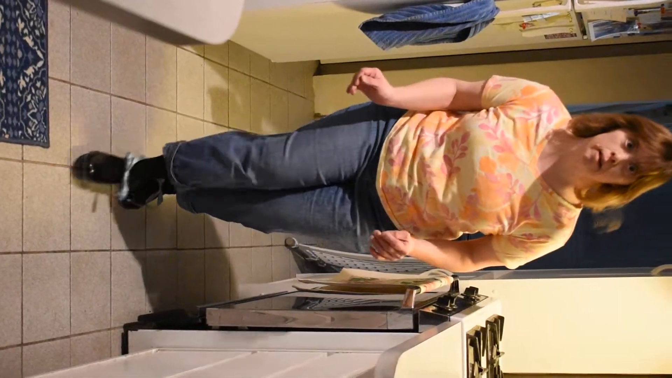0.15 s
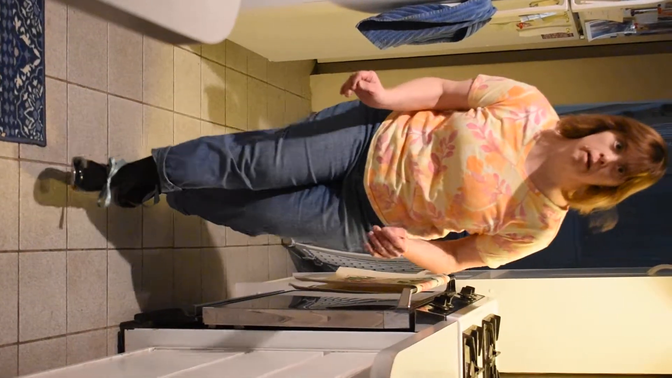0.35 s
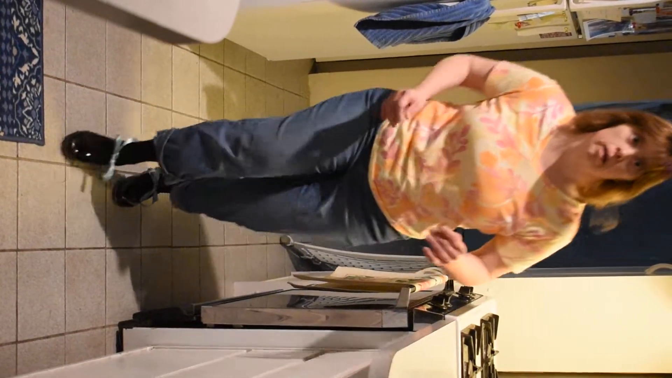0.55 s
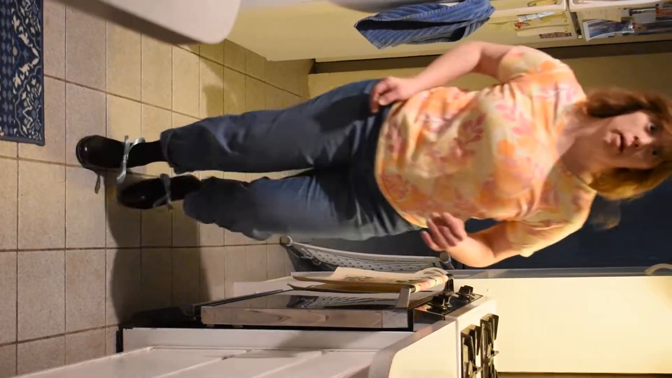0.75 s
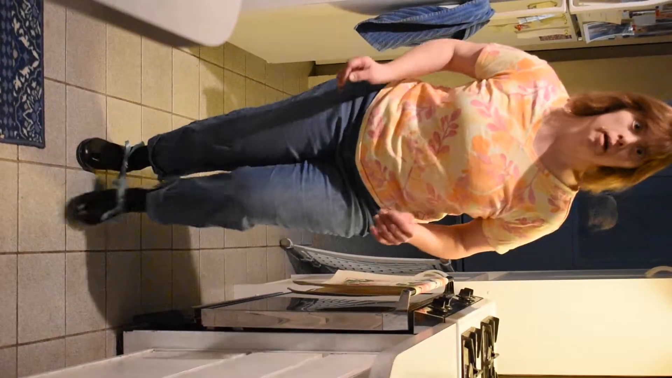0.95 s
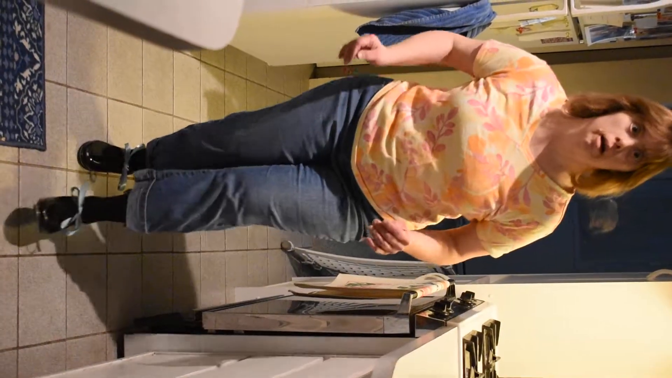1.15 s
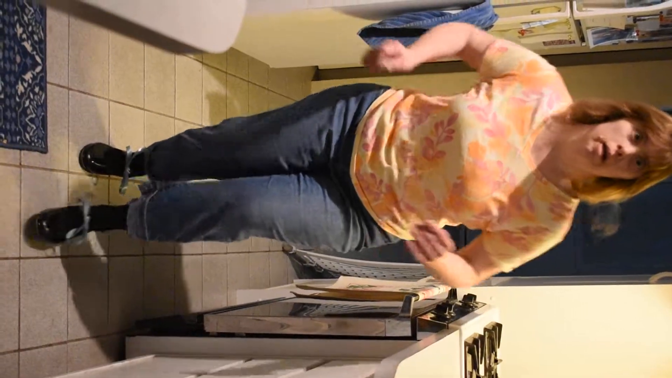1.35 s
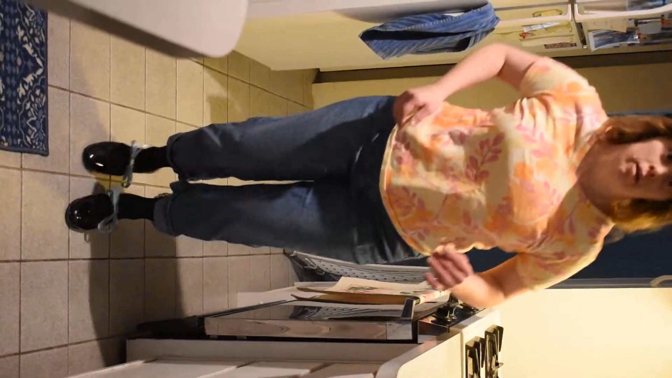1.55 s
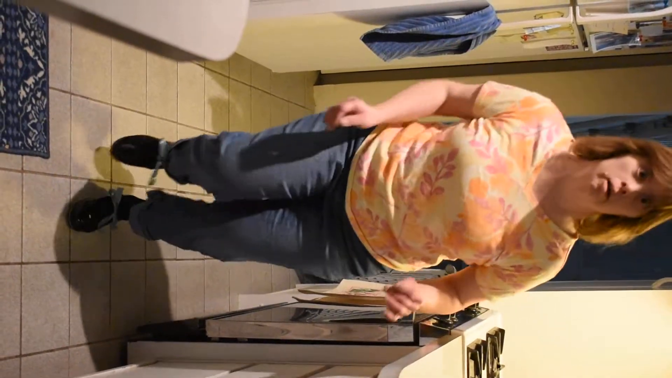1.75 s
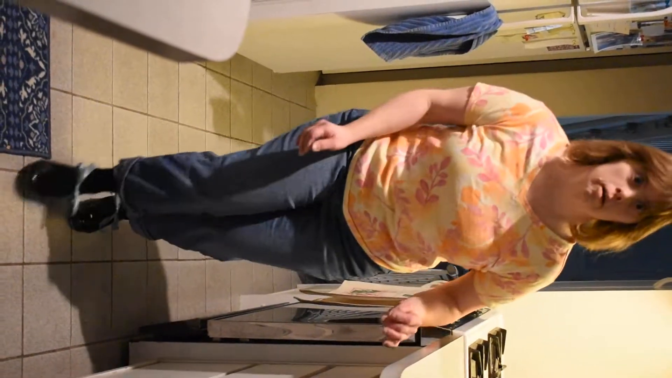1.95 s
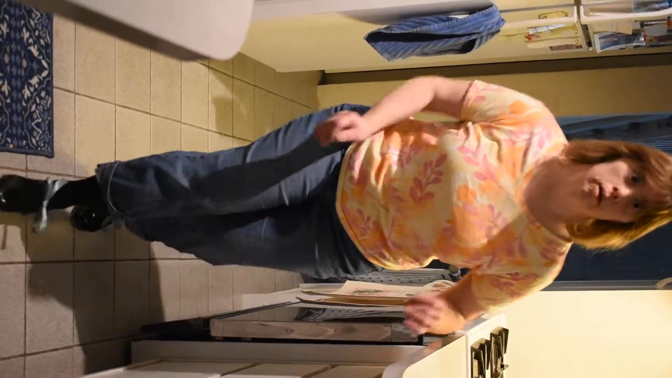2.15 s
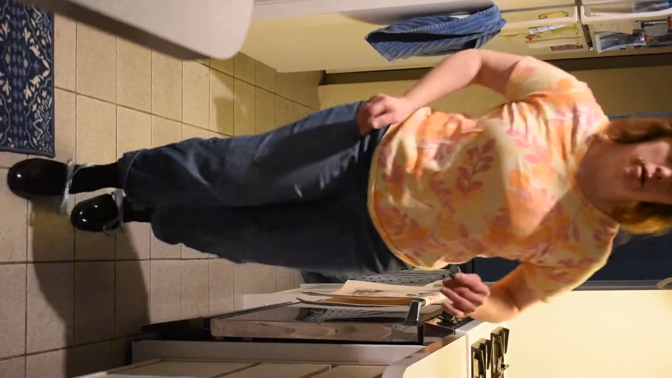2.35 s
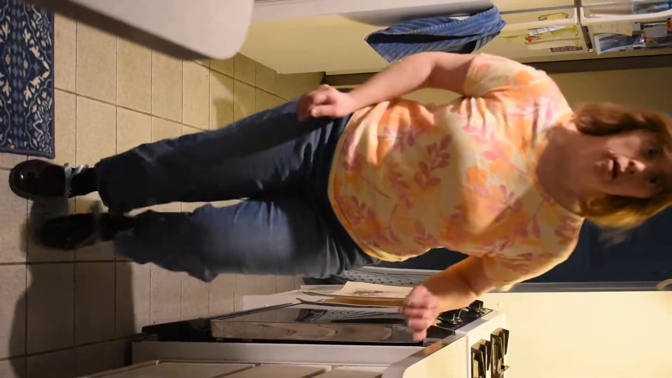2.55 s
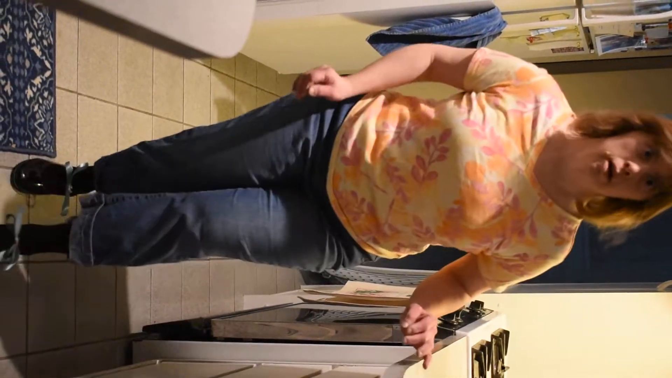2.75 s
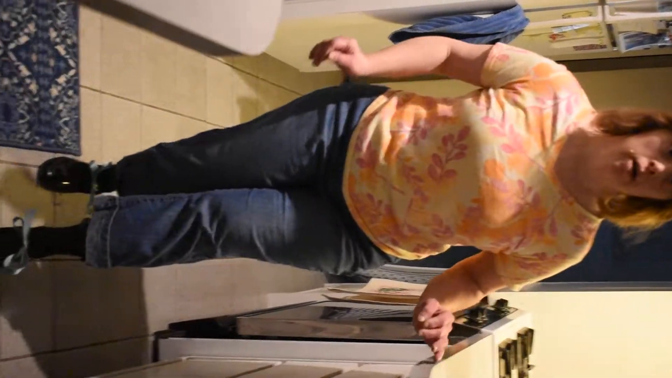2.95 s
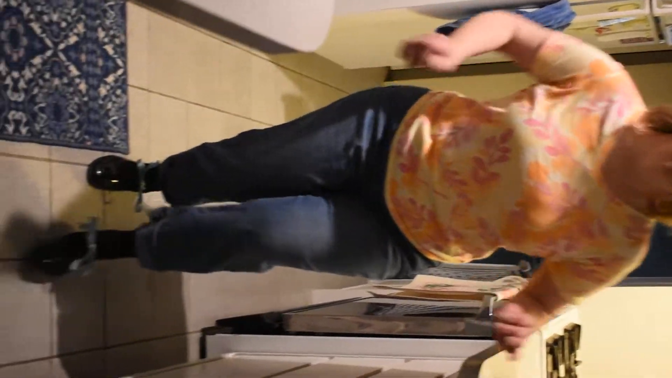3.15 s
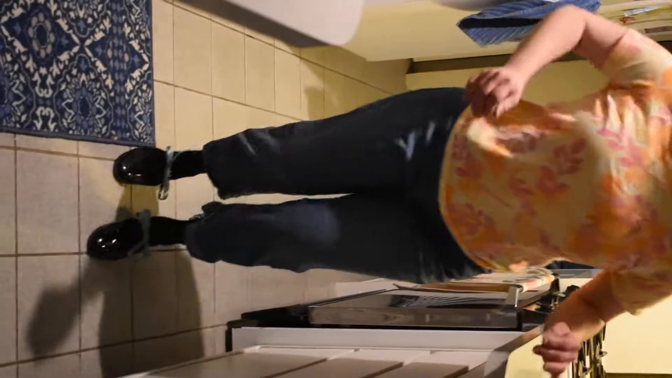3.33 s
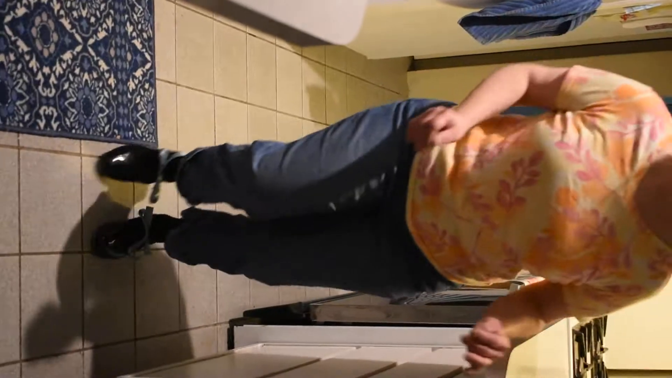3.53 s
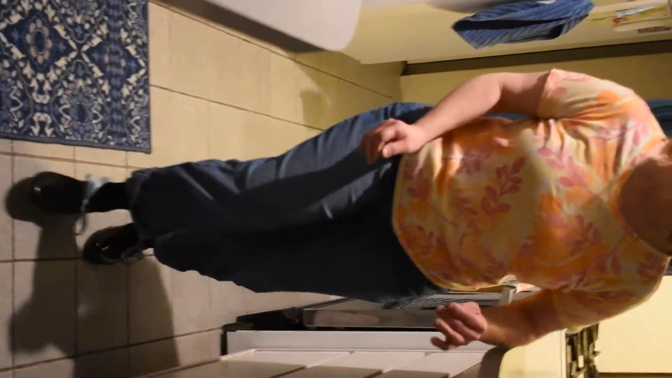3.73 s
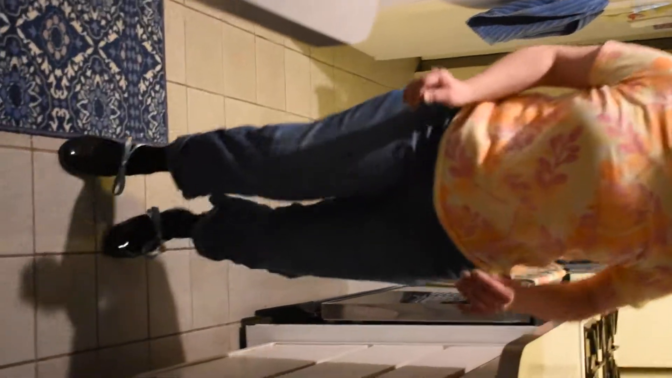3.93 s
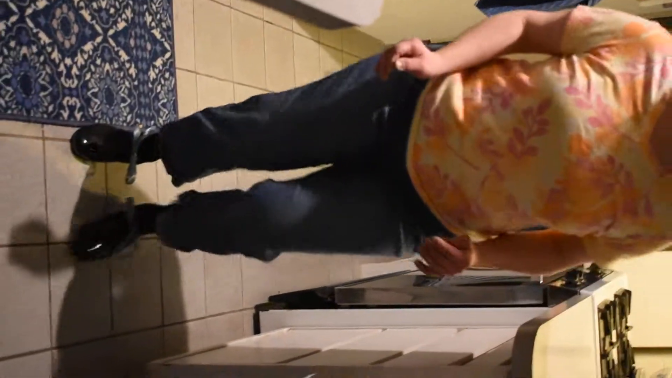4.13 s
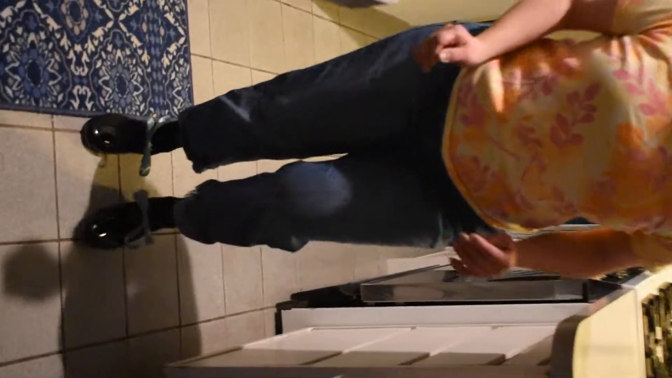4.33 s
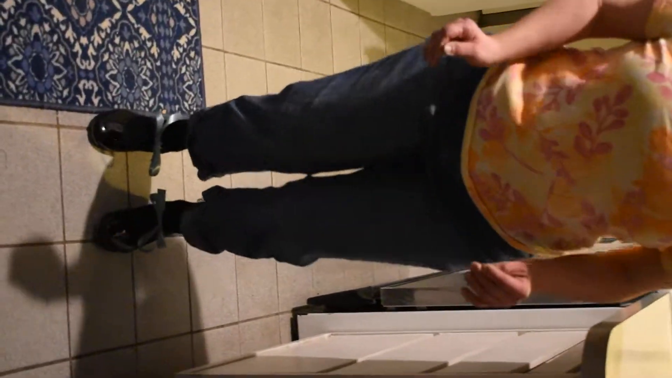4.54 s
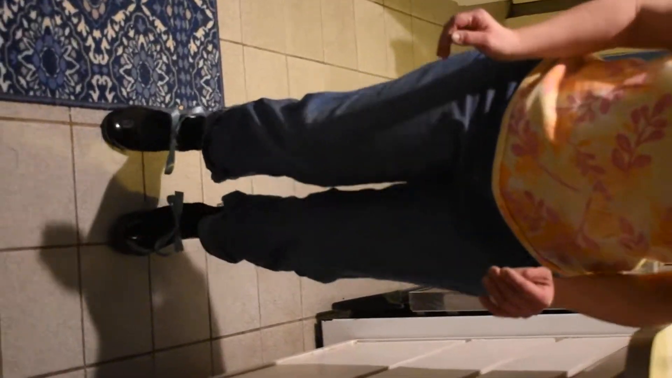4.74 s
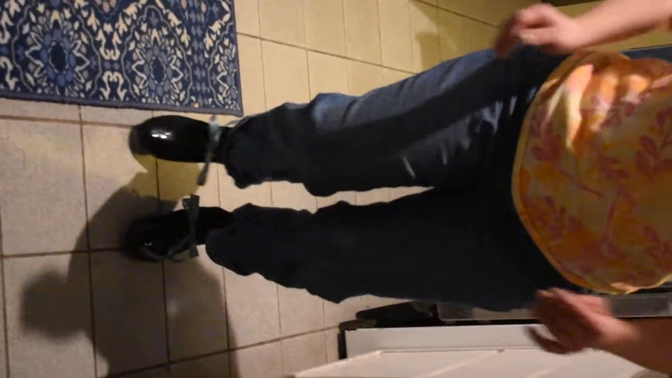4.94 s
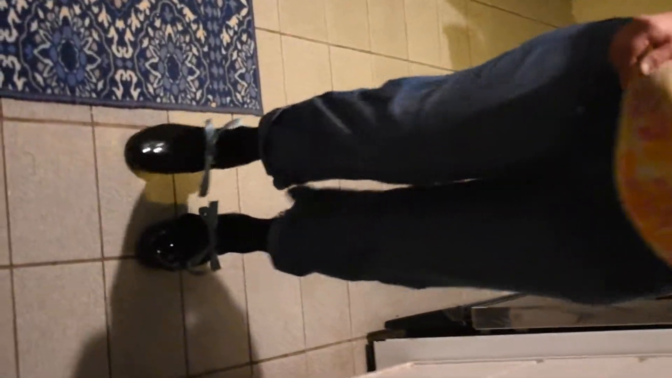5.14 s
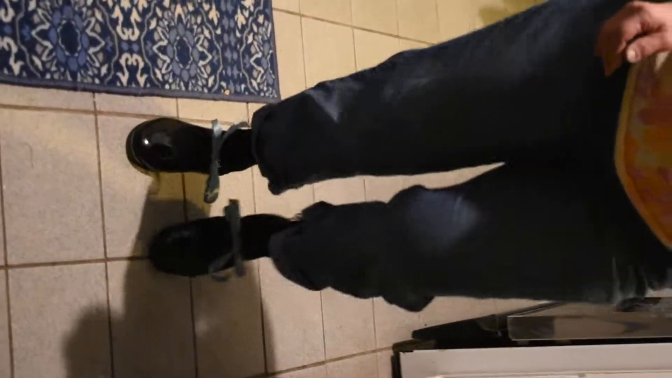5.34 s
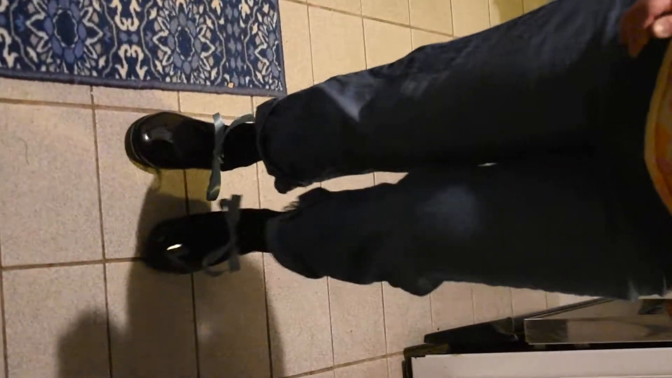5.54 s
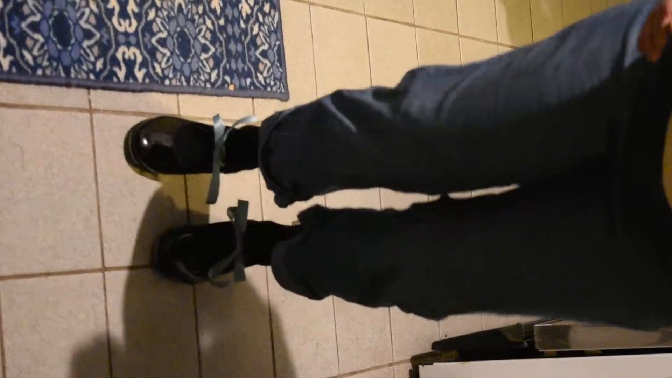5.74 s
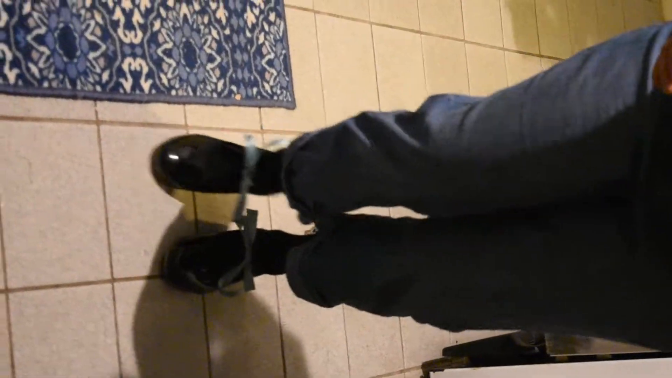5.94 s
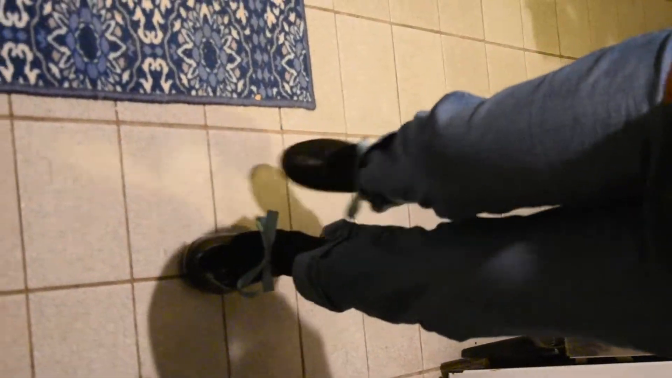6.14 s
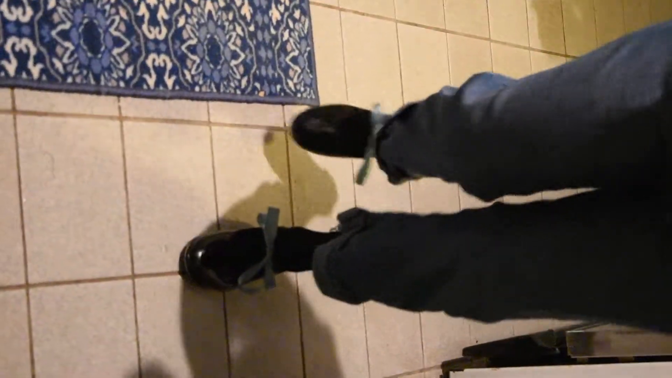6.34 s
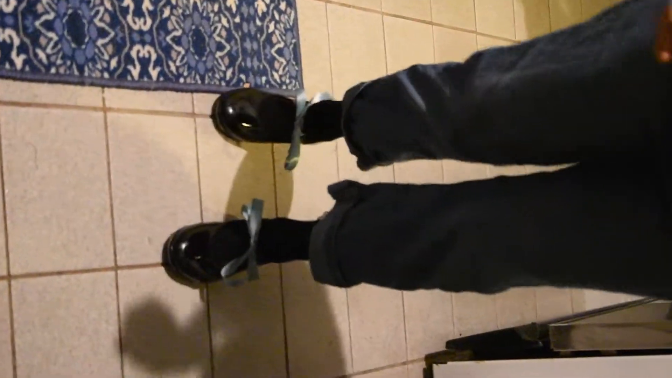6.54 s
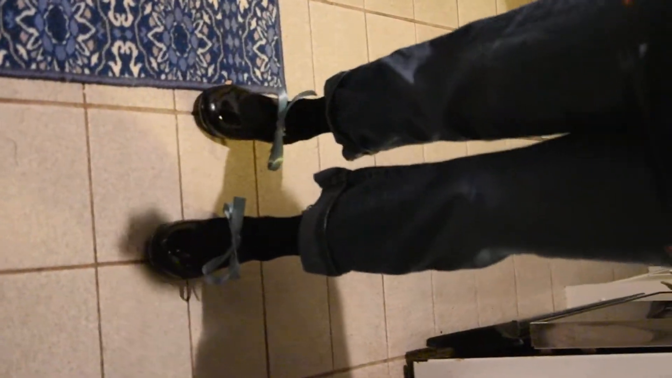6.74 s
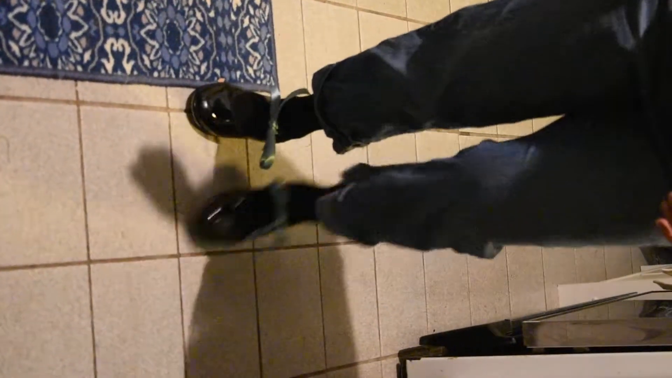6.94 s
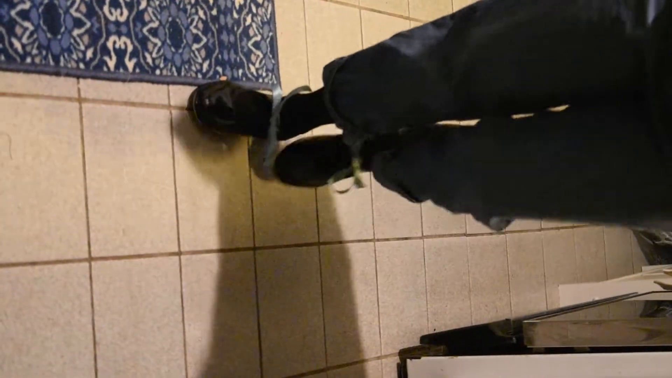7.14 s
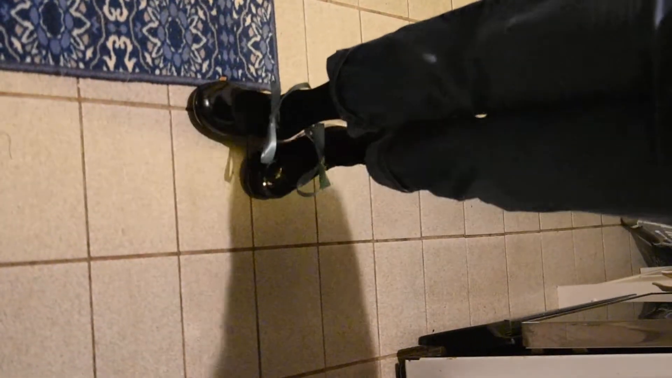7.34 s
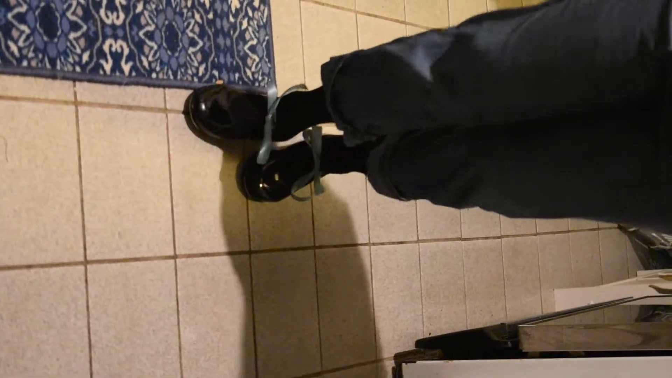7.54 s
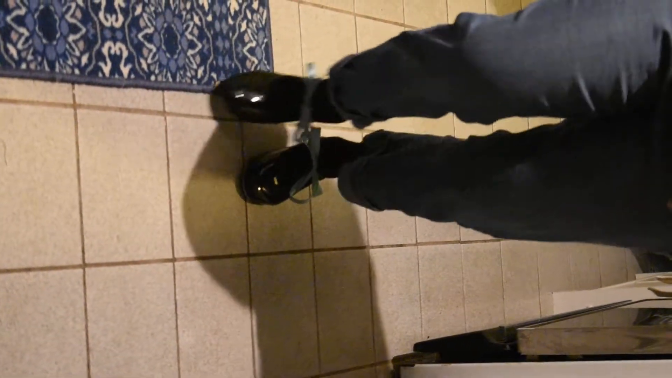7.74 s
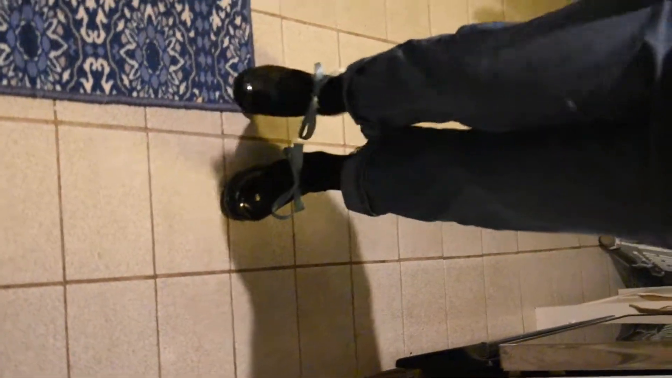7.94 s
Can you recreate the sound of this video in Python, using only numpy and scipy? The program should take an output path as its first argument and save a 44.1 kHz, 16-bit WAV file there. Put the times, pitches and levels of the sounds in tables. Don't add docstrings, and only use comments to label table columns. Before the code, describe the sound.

In a small, hard-walled kitchen, someone practises tap steps in metal-plated shoes. Sharp knocks with a loose metallic clap alternate with hollow slaps that skim across the tile, never in a steady beat. It starts strong, bunches up midway, then dwindles to isolated stamps and faint brushes. A steady soft appliance hum lies under everything, and the hand-held microphone, a few metres off, adds slight grip rumble and small plastic ticks late on.

```python
import sys
import numpy as np
from scipy import signal
from scipy.fft import rfft, irfft
from scipy.io import wavfile
from scipy.ndimage import uniform_filter1d

SR = 44100
rng = np.random.default_rng(int(sys.argv[2]) if len(sys.argv) > 2 else 0)


def to_wav(s):
    ch = np.atleast_2d(s).T
    pcm = np.round(np.clip(ch, -1, 1) * 32767)
    wavfile.write(sys.argv[1], SR, pcm.astype(np.int16))


def nominal_scale(level):
    x = np.asarray(level, float) / 20
    return 10 ** x


N = 356328

# pitch_hz, density_db (per Hz)
HUM_SPECTRUM = [(41, -46), (70, -20), (190, -6), (233, 3), (293, -3.5), (360, 0), (494, -5.5), (711, -8),
                (892, -5.5), (977, -9), (1230, -6.5), (5500, -23), (6750, -28.5), (16000, -45)]
# pitch_hz, side_to_mid_db
HUM_SPREAD = [(60, 4), (180, -16), (550, -9), (1650, -8.5), (4970, -3.5), (15000, 0.5)]
# pitch_hz, width_hz, level_db
COMPRESSOR_DRONE = [(47, 21, -71), (122.3, 21, -58.5)]
# centre_s, level_db
GRIP_SHIFTS = [
    (.56, -58),
    (1.74, -61),
    (2.45, -58),
    (2.57, -44),
    (2.9, -52),
    (3.58, -69),
    (3.8, -65),
    (5.35, -58),
    (8.01, -57),
]
# pitch_hz, width_hz, level_db
SLAB_MODES = [(193, 84, 1.5), (346, 126, 6), (500, 1330, -0.5)]
# pitch_hz, width_hz, level_db
PLATE_FACE_MODES = [(2200, 2560, 12.5), (3200, 3060, -12.5), (4300, 970, 0), (5007, 1200, -4)]
# pitch_hz, width_hz, level_db
PLATE_EDGE_MODES = [(5830, 4100, 15), (8000, 530, -8), (10700, 3800, -0.5), (12800, 4700, -2)]
# start_s, length_s, first_pressure_db, last_pressure_db, plate_ring_db
SCUFFS = [
    (0.049, 0.082, -28, -18.5, 8),
    (0.684, 0.096, -40, -36.5, 3.5),
    (1.54, 0.087, -31, -28.5, 5.5),
    (3.716, 0.2, -50.5, -60, 4.5),
    (4.66, 0.043, -50, -51, 5.5),
    (4.105, 0.11, -20.5, -25, 3.5),
    (3.486, .04, -40, -37.5, -20),
    (5.21, 0.13, -35, -45, -0.5),
    (5.359, 0.098, -31, -30.5, 6),
    (7.881, 0.16, -68, -46.5, 3.5),
]
# start_s, length_s, first_pressure_db, last_pressure_db, plate_ring_db
SKIMS = [
    (0.138, 0.061, -10, -16.5, -10),
    (.46, 0.046, -16, -30, -0.5),
    (1.032, 0.11, 0.5, -35.5, -12.5),
    (1.98, 0.12, -13.5, -12.5, -9.5),
    (2.075, 0.074, -10, -22.5, -7),
    (3.09, 0.063, -7.5, -38, -40),
    (4.054, .05, -29.5, -15, -3.5),
    (4.194, 0.049, -23, -26.5, -7),
    (3.481, 0.046, -40.5, -36, 4),
]
# contact_s, blow_db, hollow_hz, plate_ring_db, plate_edge_db
STAMPS = [(0.648, -21, 1690, 1, -16), (1.692, -25, 900, 1, -17.5), (2.373, -18, 810, 1, -9.5),
          (2.531, -21, 1000, 3.5, -20), (3.925, -22, 845, -3, -11.5), (4.101, -17, 1010, -1.5, -14),
          (4.409, -14, 910, -4, -11.5), (4.53, -35.5, 850, -6, -33.5), (5.174, -27, 935, 2.5, -2.5),
          (5.204, -30.5, 1500, -1, -4.5), (5.352, -28, 1740, 7.5, -40), (5.576, -20.5, 940, -5.5, -12.5),
          (5.668, -31.5, 1440, -3.5, -34), (6.458, -19.5, 1020, 0, -16.5), (6.686, -34, 1580, -3.5, -48),
          (7.223, -21.5, 1450, -3, -11), (7.232, -31.5, 1080, 2, -20), (7.589, -42.5, 1450, -7, -24)]
# contact_s, blow_db, hollow_hz, plate_ring_db, plate_edge_db
TAPS = [
    (0.059, -16, 1600, 0.5, -10),
    (0.846, -25, 1820, -2, -36),
    (1.308, -26.5, 974, -33.5, -23.5),
    (1.53, -17, 940, -5, -12.5),
    (3.086, -15.5, 920, -50, -25),
    (3.321, -13.5, 1180, -9, -23),
    (3.497, -30, 1820, -13, -47),
    (7.648, -38.5, 1750, -4, -18),
    (7.673, -31, 1740, -8, -23.5),
]
# contact_s, blow_db, hollow_hz, plate_ring_db, plate_edge_db
SLAPS = [
    (0.455, -9.5, 930, -26, -56),
    (0.483, -6.5, 980, -40, -49),
    (1.0235, -7, 890, -3.5, -16),
    (1.088, -19.5, 920, -49, -10),
    (1.974, -14, 920, -2, -13),
    (3.586, -38.5, 810, -24, -37),
    (4.199, -16.5, 1520, -5.5, -47),
]
# contact_s, level_db, pitch_hz, width_hz
PLATE_CHIMES = [(.062, -25.5, 5270, 1510), (.456, -36, 4300, 600), (.456, -20.5, 2200, 1220),
                (.484, -30.5, 4300, 500), (.649, -35, 6760, 2030), (.848, -42.5, 3700, 1200),
                (.848, -62, 7000, 900), (1.025, -26.5, 4440, 2500), (1.532, -49, 5800, 2000),
                (1.693, -28, 2140, 900), (2.534, -22.5, 2200, 900), (2.534, -28.5, 4050, 900),
                (3.322, -39.5, 6900, 1500), (3.322, -30, 2280, 1200), (3.5, -71, 8350, 1300),
                (3.926, -27.5, 2280, 1210), (5.177, -31, 3200, 900), (5.178, -52, 9550, 3000),
                (5.204, -43.5, 9350, 3000), (5.577, -34.5, 6500, 2470), (1.532, -45, 11200, 2500),
                (5.669, -40, 2430, 1000), (6.459, -35, 5040, 900), (6.458, -39.5, 7670, 1200),
                (6.689, -63, 3360, 1800), (7.225, -43.5, 5430, 800), (4.41, -30, 8100, 2500),
                (5.354, -40, 3400, 2200), (6.459, -48, 12500, 4000), (2.534, -44.5, 6850, 1500)]
# start_s, length_s, level_db, pitch_hz, width_hz
BRUSHES = [(1.304, 0.021, -45.5, 6800, 2700), (1.465, 0.013, -39, 3800, 1700),
           (2.215, .03, -43.5, 4370, 4200), (2.361, .012, -22.5, 3640, 6000),
           (3.043, 0.021, -52, 3200, 4200), (5.878, 0.022, -54, 4000, 4000), (5.88, 0.065, -42, 1670, 900),
           (5.965, 0.049, -67, 9300, 2500), (6.696, 0.054, -53, 2780, 2300),
           (6.837, 0.061, -46.5, 4400, 1300), (6.843, 0.052, -53, 7840, 1500), (7, 0.03, -70, 2000, 1500),
           (7.415, 0.021, -56, 5000, 6000), (7.549, 0.035, -60, 5800, 3000)]
# start_s, length_s, level_db, pitch_hz, width_hz
SINGS = [(0.074, 0.088, -18, 4800, 2160), (0.454, 0.061, -27, 3704, 1019), (1.024, 0.078, -15.5, 930, 400),
         (1.982, 0.18, -37.5, 7230, 1400), (1.988, 0.086, -25, 5000, 972), (2.0, .16, -17.5, 865, 270),
         (2.046, 0.053, -23, 2200, 520), (3.088, 0.066, -17, 980, 417), (3.089, 0.056, -38, 7300, 3500),
         (5.4, 0.04, -25, 5600, 2000), (5.367, 0.074, -24, 1450, 370.4), (1.57, 0.083, -39.5, 7300, 3500),
         (1.978, 0.11, -57, 11000, 1800), (3.09, 0.069, -19, 480, 350), (1.026, 0.059, -34, 350, 180),
         (3.485, 0.016, -50, 8100, 1400)]
# pitch_hz, level_db
DIRECT_PATH = [(300, -16.5), (1000, -8.5), (3000, -12.5), (5000, -8), (7800, -4), (10500, -9), (14000, -12)]
# delay_s, level_db
WALL_ECHOES = [(.0045, -17), (.0072, -5.5), (0.015, -49), (0.0203, -5)]
# pitch_hz, t60_s
KITCHEN_DECAY = [(120, 0.28), (320, 0.32), (900, 0.27), (2200, 0.27), (5800, 0.24), (13000, 0.17)]
# pitch_hz, side_to_mid_db
REVERB_SPREAD = [(60, -21.5), (150, -88), (380, -25.5), (950, -26), (2380, -15.5), (5980, -10.5),
                 (15000, 0)]
# start_s, level_db, pitch_hz, t60_s
HOUSING_TICKS = [(5.932, -16, 292, 0.017), (5.931, -19, 1070, 0.0051), (5.932, -23, 2200, 0.012),
                 (5.942, -35.5, 3520, .015), (6.109, -8.5, 265, 0.016), (6.11, -11, 1220, 0.0026),
                 (6.223, -41, 9500, .002), (6.257, -34, 7500, .002), (6.258, -47, 11500, .002),
                 (6.267, -34, 7490, .002), (6.268, -45, 11500, .002), (6.274, -41, 9000, .002),
                 (6.294, -42, 7000, 0.0068), (6.335, -66, 9000, .004), (6.665, -36.5, 1720, 0.11),
                 (6.665, -22, 405, 0.015), (7.952, -29.5, 187, 0.056)]

HUM_DB = -48.5
GRIP_DB, TREMOR_DB, SHIFT_S = -69.5, 4, .06
STAMP_THUD_DB, TAP_THUD_DB, SLAP_THUD_DB = 2.5, -6, -19
SCUFF_THUD_DB, SCUFF_HOLLOW_HZ, SCUFF_EDGE_DB = 1.5, 1220, -10
SKIM_THUD_DB, SKIM_HOLLOW_HZ, SKIM_EDGE_DB = -24.5, 950, -27.5
LEAD_S = .003
SLAB_HZ = 99


def evened(x):
    return x / np.sqrt(np.mean(x ** 2) + 1e-20)


def read(points, hz):
    f, value = np.transpose(points)
    return np.interp(np.log(hz + 1), np.log(f + 1), value)


def add(mix, s, sound):
    part = mix[round(s * SR):][:len(sound)]
    part += sound[:len(part)]


def resonate(x, hz, width):
    turn = np.exp(2j * np.pi * np.cumsum(hz * np.ones(len(x))) / SR)
    r = np.exp(-np.pi * width / SR)
    smooth = signal.lfilter([(1 - r) ** 2], [1, -2 * r, r * r], x / turn)
    return 2 * (turn * smooth).real


def humps(hz, modes):
    power = sum(nominal_scale(db) ** 2 / (1 + (1.495 * (hz - f) / w) ** 2) ** 3 for f, w, db in modes)
    return power / power.mean(axis=0)


def causal(gain):
    log_gain = np.log(np.r_[gain, gain[-2:0:-1]] + 1e-5)
    return np.fft.ifft(np.exp(np.conj(signal.hilbert(log_gain)))).real[:len(gain)]


def hum():
    frames, hz = N // 512 + 5, np.fft.rfftfreq(2048, 1 / SR)
    a, b, c, d, patches = rng.standard_normal((frames, len(hz), 5)).T
    patches = uniform_filter1d(patches, size=25, axis=0)
    patches = evened(uniform_filter1d(patches, size=10, axis=1))
    spread = nominal_scale(read(HUM_SPREAD, hz))[:, None]
    z = np.array([a + 1j * b, (c + 1j * d) * spread])
    z *= nominal_scale(read(HUM_SPECTRUM, hz)[:, None] + 1.3 * patches)
    air = signal.istft(z, nperseg=2048, noverlap=1536)[1][:, :N]
    return nominal_scale(HUM_DB) * air / np.std(air[0])


def drone():
    return sum(nominal_scale(db) * evened(resonate(rng.standard_normal(N), hz, w)) for hz, w, db in COMPRESSOR_DRONE)


def grip():
    hand = evened(resonate(rng.standard_normal(N), 37, 45))
    tremor = evened(resonate(rng.standard_normal(N), 3.5, 9.8))
    t = np.arange(N) / SR
    level = nominal_scale(GRIP_DB + TREMOR_DB * tremor)
    for s, db in GRIP_SHIFTS:
        level += nominal_scale(db) * np.exp(-((t - s) / SHIFT_S) ** 2)
    return hand * level


def shoe(hz, thud_db, hollow_hz, ring_db, edge_db, hollow_width):
    hollow = humps(hz, [(hollow_hz, hollow_width, 0), (1250, 1300, -7)])
    slab = nominal_scale(2 * thud_db) * humps(hz, SLAB_MODES)
    faces = nominal_scale(2 * ring_db) * humps(hz, PLATE_FACE_MODES)
    dull_db = 0.22 * np.minimum(edge_db + 18, 0) * np.log2(np.maximum(hz / 7500, 1))
    edges = nominal_scale(2 * (edge_db + dull_db)) * humps(hz, PLATE_EDGE_MODES)
    slab_cut = 1 / (1 + (140 / (hz + 1)) ** 10)
    return (hollow + slab + faces + edges) * slab_cut


def drag(s, length, first_db, last_db, ring_db, thud_db, hollow_hz, edge_db):
    t = np.arange(0, length, 1 / SR)
    slip_size = nominal_scale(4.5 * np.minimum(rng.exponential(1, len(t)), 2.8))
    slips = (rng.random(len(t)) < 1100 / SR) * slip_size
    grit = evened(slips * rng.standard_normal(len(t)))
    force = evened(grit + 0.49 * rng.standard_normal(len(t)))
    pressure_db = first_db + (last_db - first_db) * t / length
    force *= nominal_scale(pressure_db) * signal.windows.tukey(len(t), .25)
    hz, frames, z = signal.stft(np.r_[force, np.zeros(512)], SR, nperseg=512)
    gain = np.sqrt(shoe(hz[:, None], thud_db, hollow_hz, ring_db, edge_db, 390))
    return signal.istft(z * gain, SR, nperseg=512)[1]


def blow(s, db, *colour):
    hz = np.fft.rfftfreq(4096, 1 / SR)
    power = nominal_scale(2 * db) * shoe(hz, *colour, 290)
    for near_s, mode_db, mode_hz, width in PLATE_CHIMES:
        if abs(near_s - s) < .008:
            power += nominal_scale(2 * (mode_db + 5)) * humps(hz, [(mode_hz, width, 0)])
    late_s = LEAD_S + 0.001094 / (1 + (1900 / (hz + 1)) ** 4)
    lag = np.exp(-2j * np.pi * np.cumsum(late_s) * hz[1])
    knock = irfft(rfft(causal(np.sqrt(power)), 4096) * lag)[:2048]
    return nominal_scale(28.5) * knock * signal.windows.tukey(2048, .1)


def brush(length, db, hz, width):
    size = round(length * SR)
    return nominal_scale(db) * evened(resonate(rng.standard_normal(size), hz, width)) * np.hanning(size)


def tail(colour_db, build_s):
    t = np.arange(SR) / SR
    taps = rng.choice([-1., 1.], SR) * (rng.random(SR) < .12) * (1 - np.exp(-t / build_s))
    hz, frames, z = signal.stft(taps, SR, nperseg=256)
    decay = nominal_scale(-60 * frames / read(KITCHEN_DECAY, hz)[:, None])
    echoes = signal.istft(z * decay, SR, nperseg=256)[1][:SR]
    power = uniform_filter1d(abs(rfft(echoes)) ** 2, size=160)[::50]
    colour = nominal_scale(colour_db(np.linspace(0, SR / 2, len(power))))
    return signal.oaconvolve(echoes, causal(colour / np.sqrt(power)))


def kitchen(x):
    direct_gain = nominal_scale(read(DIRECT_PATH, np.fft.rfftfreq(512, 1 / SR)))
    path = np.r_[causal(direct_gain), np.zeros(1200)]
    near = path.copy()
    for s, db in WALL_ECHOES:
        add(near, s, nominal_scale(db) * path)
    mid, side, t = signal.oaconvolve(x, near)[:N], 0, np.arange(N) / SR
    for k in range(3):
        part = x * np.sqrt(2 / 3) * np.cos(2 * np.pi * (.9 * t + k / 3))
        mid = mid + signal.oaconvolve(part, tail(np.zeros_like, 0.0027))[:N]
        side_tail = tail(lambda hz: read(REVERB_SPREAD, hz) + .4, 0.00096)
        side = side + signal.oaconvolve(part, side_tail)[:N]
    return np.array([mid, side])


def tick(db, hz, t60):
    t = np.arange(2205) / SR
    onset = 1 - np.exp(-1.5 * hz * t)
    return nominal_scale(db - 60 * t / t60) * np.sin(2 * np.pi * hz * t) * onset


def scene():
    housing, air, feet = drone() + grip(), hum(), np.zeros(N)
    for row in SCUFFS:
        add(feet, row[0], drag(*row, SCUFF_THUD_DB, SCUFF_HOLLOW_HZ, SCUFF_EDGE_DB))
    for row in SKIMS:
        add(feet, row[0], drag(*row, SKIM_THUD_DB, SKIM_HOLLOW_HZ, SKIM_EDGE_DB))
    for rows, thud_db in ((STAMPS, STAMP_THUD_DB), (TAPS, TAP_THUD_DB), (SLAPS, SLAP_THUD_DB)):
        for s, db, *colour in rows:
            add(feet, s - LEAD_S, blow(s, db, thud_db, *colour))
    for s, *row in BRUSHES + SINGS:
        add(feet, s, brush(*row))
    for s, *row in HOUSING_TICKS:
        add(housing, s, tick(*row))
    low_cut = signal.butter(4, SLAB_HZ, "high", fs=SR, output="sos")
    mid, side = signal.sosfilt(low_cut, kitchen(feet)) + air
    return np.array([mid + housing + side, mid + housing - side])


def top_cut(x):
    return signal.sosfilt(signal.butter(12, 16550, fs=SR, output="sos"), x)


def record(dry):
    power_db = 10 * np.log10(abs(uniform_filter1d((dry ** 2).mean(0), 900)) + 1e-12)
    fall = np.arange(N) * 62.0 / SR
    peak_db = np.maximum.accumulate(power_db + fall) - fall
    over_db = np.maximum(peak_db + 17.0, 0)
    ducked = dry / nominal_scale(0.045 * signal.lfilter([.0006], [1, -1 + 0.00093], over_db))
    limited = 2.182 * np.tanh(ducked / 3.694)
    band_limit = signal.firwin(101, 16100, fs=SR)
    return top_cut(signal.oaconvolve(limited, band_limit[None], "same"))


dry = scene()
out = record(dry)
to_wav(out)
```